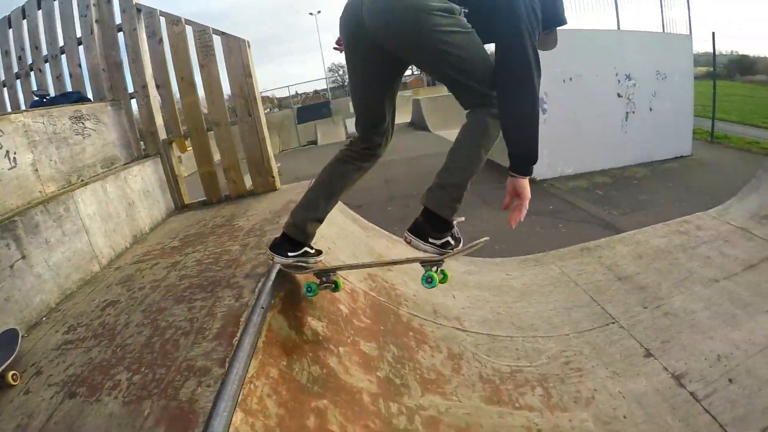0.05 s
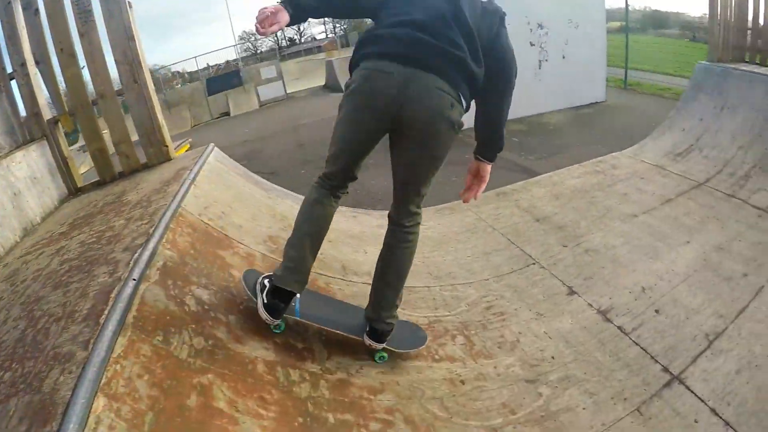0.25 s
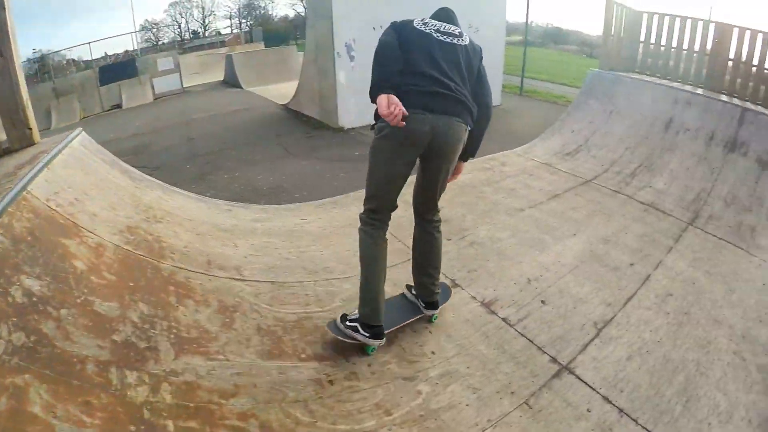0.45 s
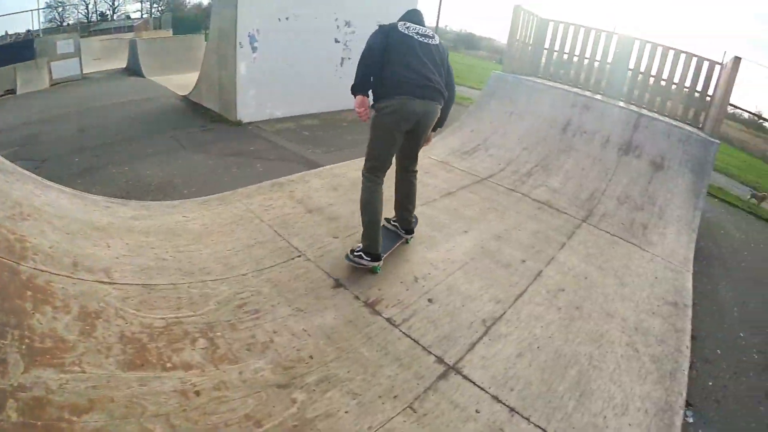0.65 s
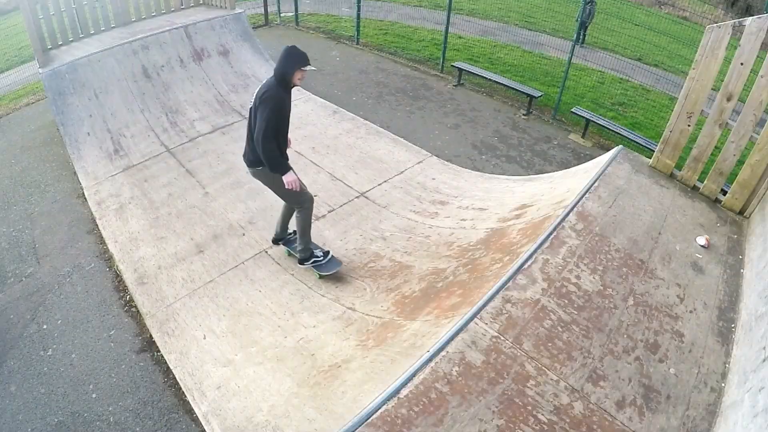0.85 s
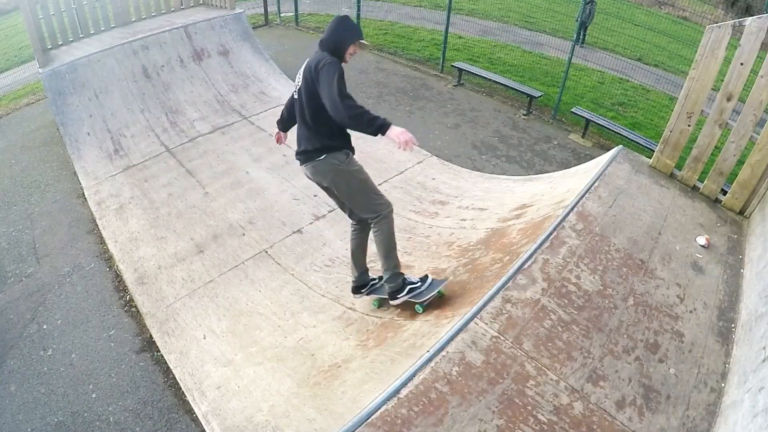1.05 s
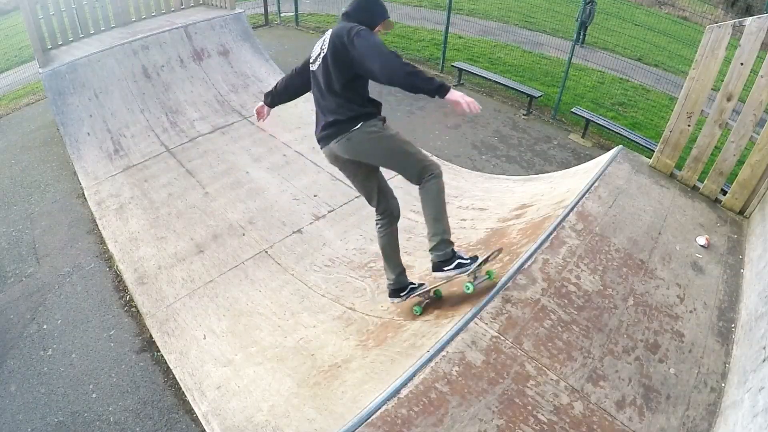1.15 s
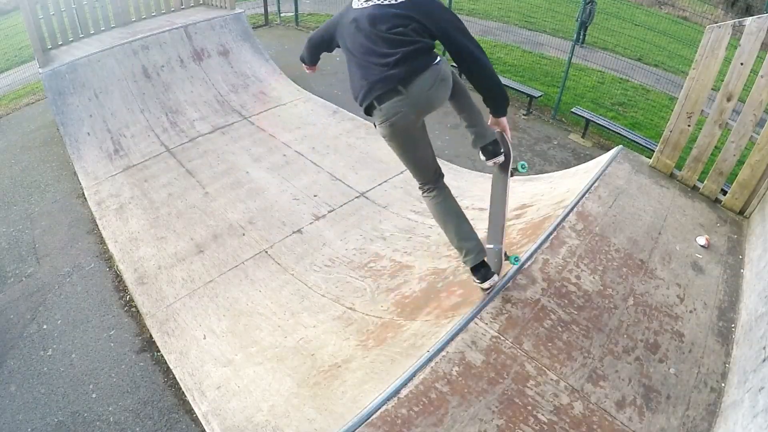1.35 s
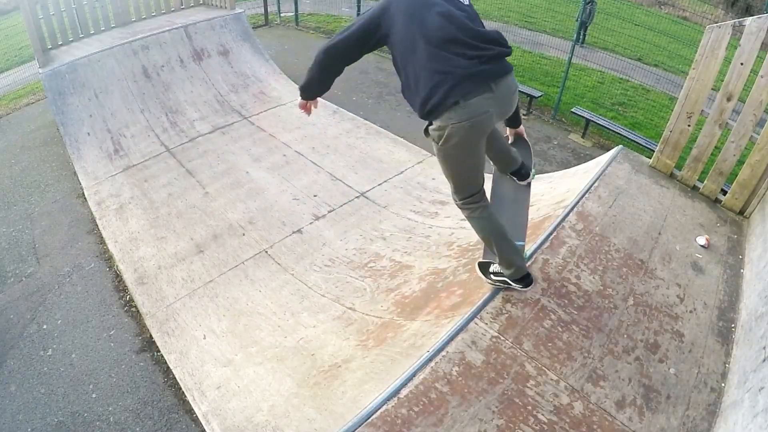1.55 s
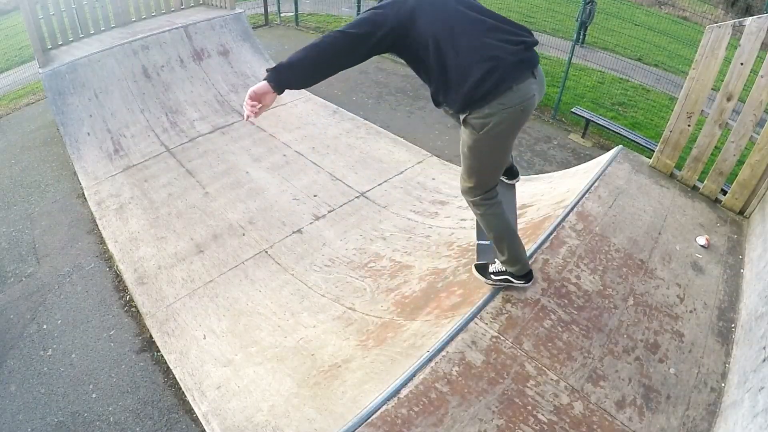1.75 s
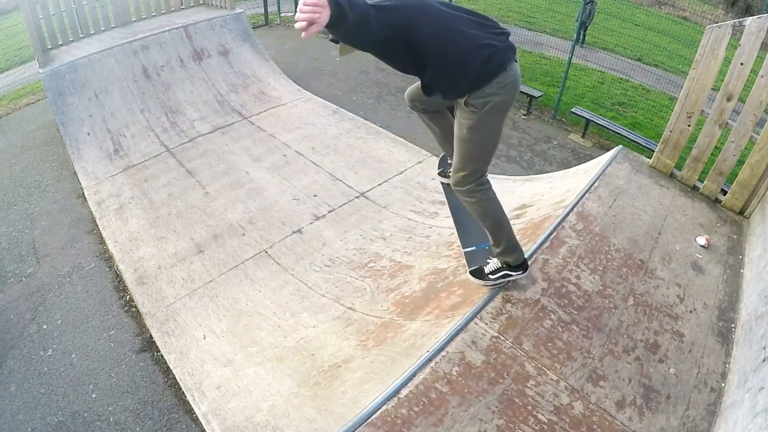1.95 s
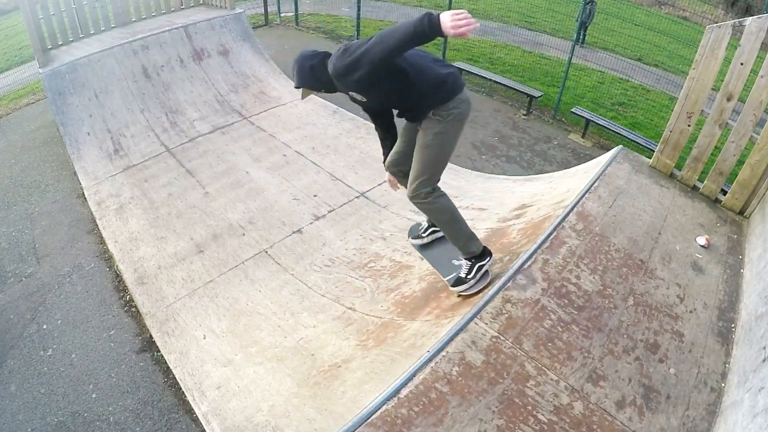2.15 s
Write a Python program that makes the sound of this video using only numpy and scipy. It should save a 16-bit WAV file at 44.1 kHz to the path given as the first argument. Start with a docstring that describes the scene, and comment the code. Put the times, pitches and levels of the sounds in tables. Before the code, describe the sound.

A skateboard drops into an outdoor wooden ramp with two booming clacks that overload the microphone. It rumbles over seams, fades, returns louder, then knocks twice on the top edge and stops. Light wind and distant traffic lie behind.

```python
"""A skateboard drops into an outdoor wooden ramp, both pairs of wheels slamming down hard enough to
overload the microphone. Each blow makes the hollow ramp boom and the deck (the wooden board) ring.
It rolls away over grit and panel seams, comes back louder, knocks twice onto the coping (the ramp's
top edge) and stops there. Shoes scuff the board's rough grip tape.
Behind it are distant traffic, a little wind and a faint bird."""
import sys
import numpy as np
from scipy import signal
from scipy.fft import rfft, irfft
from scipy.io import wavfile
from scipy.ndimage import uniform_filter1d, map_coordinates

SR = 44100
rng = np.random.default_rng(int(sys.argv[2]) if len(sys.argv) > 2 else 0)


def pcm_store(signal):
    """Save signal as 16-bit PCM."""
    levels = np.round(np.clip(np.atleast_2d(signal), -1, 1) * 32767)
    wavfile.write(sys.argv[1], SR, levels.astype(np.int16).T)


N = 97020
T = np.arange(N) / SR

# Blows of the board. A fade is the time a sound takes to drop by 60 dB.
# start_s, boom_db, thud_db, clack_db, clack_hz, clack_rise_s, overtone_db,
# crack_db, crack_fade_s, crack_top_hz
BLOWS = [ (0.205, -20, -19, -22, 740, 0.003, -33, -27, 0.044, 9000),
         (0.214, -37, -48, -19, 680, 0.0019, -30, -29.5, 0.04, 12000),
         (0.2403, -41, -19, 0.5, 481.4, 0.0039, -8.5, -13.5, 0.04, 17000),
         (0.2452, -4.5, -1.5, -7.5, 654, 0.0036, -18.5, -19.5, 0.032, 17100),
         (0.3129, -53, -16, -10, 692, 0.0049, -28, -20.5, 0.033, 16100),
         (0.3163, -17, -3, 3, 598, 0.0015, -11.5, -13, 0.027, 14000),
         (1.334, -17.5, -23.5, -19.5, 810, 0.006, -56, -21, 0.076, 9200),
         (1.4361, -19, -24.5, -20.5, 760, 0.0057, -33, -20.5, 0.11, 7140),
         (1.479, -37, -60, -35.5, 460, 0.0039, -31.5, -31.5, 0.082, 9400),
         (2.179, -30, -50, -40.5, 700, 0.0035, -47, -45.5, 0.078, 9100)]
# Notes the ramp's panels ring at: pitch_hz, level_db, fade_s
PANEL_NOTES = [(82, -3.5, 0.16), (117.4, 0, 0.054), (201, 0, 0.061), (264.4, -9, 0.071),
               (342.7, -10, 0.079)]
# Notes of the deck and its metal axles: pitch_hz, level_db, fade_ratio (times the crack's fade)
DECK_NOTES = [(270.6, 2, 1.2), (579, -6.5, 1.4), (726, -3, 1.3), (791, -4.5, 1.3), (988, -4, 1.1),
              (1108, -7, .8), (1437, -5.5, .9), (1892, -6, .8), (2286, -9, .8), (2486, -11.5, .8),
              (2778, -19.5, .9), (3980, -11, .9)]
# Tone colour of a blow's splintery crack: frequency_hz, level_db
CRACK_COLOUR = [(150, -2.5), (500, 8.5), (1000, 2), (1500, -3.5), (4800, -9.5), (6500, -18.5), (10000, -24),
                (15500, -28.5)]
# Loudness of the four rolling sounds: time_s, hum_db, rumble_db, roar_db, hiss_db
ROLL_LEVELS = [(0.15, -57, -61, -60, -61.5), (0.208, -34.5, -35.5, -48, -50.5),
               (0.37, -26, -32, -40.5, -60.5), (0.57, -25, -32, -39.5, -53.5),
               (0.68, -26.5, -33, -45.5, -61.5), (0.78, -35, -38.5, -49.5, -65),
               (0.823, -34, -25.5, -36, -54), (0.93, -24, -24, -28.5, -52),
               (0.99, -20, -25.5, -21.5, -48.5), (1.07, -18, -21.5, -24.5, -48),
               (1.16, -26, -21.5, -21, -51.5), (1.23, -37, -29.5, -28.5, -51),
               (1.299, -30, -31.5, -44, -58), (1.385, -36, -39.5, -38, -52.5),
               (1.42, -46, -47.5, -50.5, -66.5), (1.58, -46, -49, -44.5, -52)]
# Tone colours of panel hum, deck rumble, wheel roar and bearing hiss: frequency_hz, level_db
HUM_COLOUR = [(60, -15.5), (100, -4), (138, 3.5), (180, -9.5), (500, -40)]
RUMBLE_COLOUR = [(90, -96), (170, -4.5), (230, 2), (500, -1), (800, -7), (1400, -27.5)]
ROAR_COLOUR = [(450, -13), (700, 1.5), (860, -6), (1000, 0), (1220, -19), (1800, -22.5), (2800, -46),
               (6000, -44)]
HISS_COLOUR = [(700, 0), (1400, 7), (2400, 1.5), (3400, -11.5), (4650, 2), (5500, -14.5), (7000, -13.5),
               (15000, -18.5)]
# Notes the wheels ring at within the roar: pitch_hz, level_db
WHEEL_NOTES = [(630, -5), (810, 2.5), (1000, -5)]
# Wheels crossing seams: start_s, thud_db, clack_db, clack_hz, tick_db, tick_hz
SEAM_BUMPS = [ (0.400, -21, -17, 436, -44.5, 1200), (0.542, -14.5, -24, 391, -41.5, 2490),
              (0.622, -23.5, -23, 432, -41, 1633), (0.831, -14, -23, 701, -34, 1730),
              (0.867, -15.5, -26, 463, -43.5, 4500), (0.908, -8.5, -23.5, 502, -31, 1080),
              (0.944, -7, -17, 421, -33.5, 1300), (1.097, -24, -10, 787, -64.5, 2500),
              (1.134, -12, -19, 630, -23, 2000), (1.339, -33, -16.5, 269.6, -30.5, 2210)]
# Tone colour of a loose, ticking bearing: frequency_hz, level_db
BEARING_COLOUR = [(1500, 2.5), (2450, 2), (3400, -8), (4500, 2), (6000, -15)]
# A spinning bearing's whine: peak_s, half_length_s, pitch_hz, glide_hz_per_s, level_db
BEARING_WHINES = [(.15, 0.022, 4500, -500, -63)]
# The board scraping just before it catches: peak_s, half_length_s, level_db
BOARD_SCRAPES = [(0.188, .008, -44), (0.29, 0.0088, -29), (1.331, 0.004, -32), (1.436, 0.0049, -24)]
# Shoes rubbing on grip tape: peak_s, half_length_s, level_db
SHOE_SCUFFS = [(0.072, 0.016, -45), (0.38, 0.02, -46), (1.48, 0.073, -53.5), (2.114, 0.019, -55.5)]
# Tone colour of those scuffs: frequency_hz, level_db
SCUFF_COLOUR = [(500, 13), (1500, 1), (4400, 0.5), (6500, -13), (15000, -21.5)]
# Tone colours of distant traffic and of wind on the microphone: frequency_hz, level_db
TRAFFIC_COLOUR = [(25, 11.5), (55, 12.5), (120, -9.5), (280, -11.5), (650, -7.5), (950, -11), (1300, -26.5),
                  (2500, -33), (5000, -38), (15000, -49)]
WIND_COLOUR = [(30, 6.5), (52, 7), (85, -3), (235, -22.5), (600, -46)]
# Gusts of wind: time_s, level_db
WIND_GUSTS = [(0, -39.5), (0.7, -39.5), (1.05, -21), (1.74, -43), (1.9, -39), (1.97, -28), (2.08, -25),
              (2.13, -36.5)]
# A far bird's notes: peak_s, half_length_s, pitch_hz, glide_hz_per_s, level_db
BIRD_CHIRPS = [(1.87, .04, 2330, -900, -70), (2.01, .055, 2945, -900, -68)]

CRACK_RISE_S = 0.0012


def knocks():
    """Each blow booms in the ramp, thuds in its panels, clacks at the wheels and cracks in the deck."""
    times, boom_db, thud_db = np.transpose(BLOWS)[:3]
    out = ring(times, boom_db, hz=50.5, fade_s=0.41) + panels(times, thud_db)
    for start_s, _, _, clack_db, hz, rise_s, overtone_db, crack_db, fade_s, top_hz in BLOWS:
        age = np.minimum(since(start_s), 1)
        treble_cut = signal.butter(2, top_hz, fs=SR, output="sos")
        crack = signal.sosfilt(treble_cut, burst(age, fade_s) * noise(CRACK_COLOUR))
        overtone = clack(age, overtone_db, hz * 1.79, rise_s * 0.59)  # higher and shorter
        out += clack(age, clack_db, hz, rise_s) + overtone
        out += from_db(crack_db) * (crack + deck(age, fade_s))
    return out


def panels(times, thud_db):
    """The ramp's struck panels thud with several low notes at once."""
    return sum((-1) ** k * ring(times, thud_db + db, hz, fade_s)  # every other note swings the other way
               for k, (hz, db, fade_s) in enumerate(PANEL_NOTES))


def clack(age, db, hz, rise_s):
    """A wheel hits wood: a hollow note that builds quickly and dies."""
    return from_db(db) * age / rise_s * np.exp(1 - age / rise_s) * np.sin(2 * np.pi * hz * age)


def deck(age, fade_s, level_db=-4, scatter_db=3.5):
    """The struck deck rings, with a new mix of its notes on every blow."""
    out = np.zeros(N)
    for k, (hz, db, fade_ratio) in enumerate(DECK_NOTES):
        strength = from_db(level_db + db + scatter_db * rng.standard_normal())
        out += (-1) ** k * strength * np.sin(2 * np.pi * hz * age) * fade(age, fade_ratio * fade_s)
    return (1 - np.exp(-age / CRACK_RISE_S)) * out


def rolling(stop_s=1.52):
    """Rolling over grit shakes the panels, deck, wheels and bearings until the board stops."""
    judder = flutter(depth_db=2.5, slow_hz=3.9, fast_hz=39)
    rattle = flutter(depth_db=3, slow_hz=20.5, fast_hz=41)
    hum, rumble, roar, hiss = map(grit, (HUM_COLOUR, RUMBLE_COLOUR, ROAR_COLOUR, HISS_COLOUR))
    wheels = through_curve(roar + sum(wheel_note(hz, db) for hz, db in WHEEL_NOTES))
    layers = (hum, judder * rumble, judder * wheels, rattle * hiss)
    mix = sum(gain * layer for gain, layer in zip(gain_curves(ROLL_LEVELS), layers))
    return fade(since(stop_s), fade_s=0.25) * mix


def grit(colour, grains_per_s=5000, spread_db=3.5):
    """Tiny grains under the wheels make clicks so close together that they blur into noise."""
    sizes = from_db(spread_db * np.minimum(rng.exponential(1, N), 4))
    signs = rng.choice([-1, 1], N)
    hits = rng.random(N) < grains_per_s / SR
    return steadied(tint(sizes * signs * hits, colour), window_s=0.14)


def wheel_note(hz, db, width_hz=55):
    """Grit keeps a wheel ringing: noise narrowed down to one note."""
    b, a = signal.iirpeak(hz, hz / width_hz, fs=SR)
    narrowed = signal.lfilter(b, a, rng.standard_normal(N))
    return from_db(db) * steadied(signal.lfilter(b, a, narrowed), window_s=0.073)


def through_curve(roar, highest_s=1.15, glide_per_s=0.3):
    """The roar climbs in pitch as the wheels press into the ramp's curve, then sinks as they slow."""
    speed = np.clip(1 - glide_per_s * np.abs(T - highest_s), 0.88, 1)
    return unit_level(map_coordinates(roar, [np.cumsum(speed)], order=3, mode="wrap"))


def seams():
    """A wheel drops into a gap between panels: a thud, a clack and a ringing tick from the axle."""
    times, thud_db = np.transpose(SEAM_BUMPS)[:2]
    out = panels(times, thud_db)
    for start_s, _, clack_db, clack_hz, tick_db, tick_hz in SEAM_BUMPS:
        age = since(start_s)
        rasp = noise([(tick_hz / 2, -7), (tick_hz, 0), (tick_hz * 2, -14), (tick_hz * 10, -54)])
        tick = rasp + np.sin(2 * np.pi * tick_hz * age)
        out += clack(age, clack_db, clack_hz, rise_s=0.0053)
        out += from_db(tick_db) * burst(age, fade_s=0.036) * tick
    return out


def bearings(start_s=0.546, end_s=0.735, turn_s=0.029, tick_db=-44.5):
    """A loose bearing ticks once per wheel turn, fading as it rolls away; another briefly whines."""
    age = since(start_s)
    pulses = burst(age % turn_s, fade_s=0.06) * fade(age, fade_s=1.8) * (T < end_s)
    ticks = from_db(tick_db) * pulses * noise(BEARING_COLOUR)
    return ticks + sum(whistle(*whine) for whine in BEARING_WHINES)


def rubs(rows, colour):
    """Rubbing makes short swells of noise: shoes on grip tape, or the board dragging on the ramp."""
    return noise(colour) * sum(from_db(db) * swell(peak_s, half_s) for peak_s, half_s, db in rows)


def click(start_s=0.8054, level_db=-19):
    """One sharp, dry click during the roll."""
    return from_db(level_db) * (T >= start_s) * fade(since(start_s), fade_s=0.005)


def outdoors(traffic_db=-40):
    """Wind buffets the microphone, distant traffic rumbles and a far bird chirps twice."""
    wind = gain_curves(WIND_GUSTS)[0] * steadied(noise(WIND_COLOUR), window_s=0.2)
    traffic = from_db(traffic_db) * noise(TRAFFIC_COLOUR)
    bird = sum(whistle(*chirp) for chirp in BIRD_CHIRPS)
    return wind + traffic + bird


def whistle(peak_s, half_s, hz, glide_hz_per_s, db, waver_hz=25):
    """A short, thin tone that slides and wavers in pitch."""
    pitch = hz + glide_hz_per_s * (T - peak_s) + waver_hz * noise([(10, 0.015), (80, 0)])
    return from_db(db) * swell(peak_s, half_s) * np.sqrt(2) * np.sin(2 * np.pi * np.cumsum(pitch) / SR)


def ring(times, db, hz, fade_s):
    """One note that rings and fades each time it is struck."""
    strikes = np.zeros(N) + 1e-18
    np.add.at(strikes, (times * SR).astype(int), from_db(db))
    decay, angle = fade(1 / SR, fade_s), 2 * np.pi * hz / SR  # both per sample
    return signal.lfilter([0, decay * np.sin(angle)], [1, -2 * decay * np.cos(angle), decay ** 2], strikes)


def burst(age, fade_s, echo_db=-27):
    """The loudness of a hit: fast rise, fast fall and a faint echo from the walls around."""
    echo = from_db(echo_db) * fade(age, fade_s=0.16)
    return (1 - np.exp(-age / CRACK_RISE_S)) * (fade(age, fade_s) + echo)


def swell(peak_s, half_s):
    """A smooth, bell-shaped rise and fall."""
    return np.exp(-0.5 * ((T - peak_s) / half_s) ** 2)


def fade(age, fade_s):
    """Die away by 60 dB every fade_s seconds."""
    return np.exp(-np.log(1000) * age / fade_s)


def since(start_s):
    """A sound's age in seconds, zero before it starts."""
    return np.maximum(T - start_s, 0)


def flutter(depth_db, slow_hz, fast_hz):
    """A random wobble in loudness."""
    return from_db(depth_db * noise([(slow_hz, 0), (fast_hz, 0)]))


def noise(colour):
    """Steady noise with the given tone colour."""
    return tint(rng.standard_normal(N), colour)


def tint(x, colour):
    """Shape a sound's lows and highs to follow rows of frequency_hz, level_db."""
    hz, db = np.transpose(colour)
    freqs = np.maximum(np.arange(N // 2 + 1) * SR / N, 1)
    shape = from_db(np.interp(np.log(freqs), np.log(hz), db))
    edge_cut = np.minimum(freqs / hz[0], 1) ** 2 * np.minimum(hz[-1] / freqs, 1) ** 2
    return unit_level(irfft(rfft(x) * edge_cut * shape, N))


def steadied(x, window_s):
    """Even out the slow swells of a noise."""
    return x / np.sqrt(uniform_filter1d(x ** 2, int(window_s * SR)) + 1e-9)


def unit_level(x):
    """Scale a sound to an average (rms) level of 1."""
    return x / np.sqrt(np.mean(x ** 2) + 1e-20)


def gain_curves(rows):
    """One loudness curve over time for each decibel column of a table."""
    times, *columns = np.transpose(rows)
    return [from_db(np.interp(T, times, db)) for db in columns]


def from_db(db):
    """Turn decibels into a number to multiply by."""
    return 10 ** (np.asarray(db) / 20)


def scene():
    """Board, rider and surroundings in one channel."""
    board = knocks() + seams() + rolling() + bearings()
    shoes = rubs(SHOE_SCUFFS, SCUFF_COLOUR)
    scrapes = rubs(BOARD_SCRAPES, ROAR_COLOUR)
    return (board + shoes + scrapes + click() + outdoors())[None]


def record(dry, lowest_hz=32.7, highest_hz=15600):
    """The microphone drops the deepest bass, overloads on the hardest blows and cuts the top treble."""
    dry = signal.sosfilt(signal.butter(2, lowest_hz, "high", fs=SR, output="sos"), dry)
    flattened = dry / (1 + dry ** 6) ** (1 / 6)  # rounds peaks off below 1
    return signal.sosfilt(signal.ellip(10, 0.2, 80, highest_hz, fs=SR, output="sos"), flattened)


dry = scene()
out = record(dry)
pcm_store(out)
```